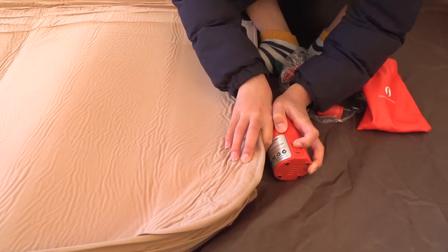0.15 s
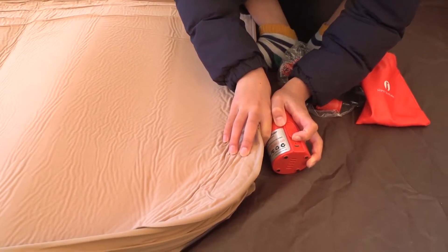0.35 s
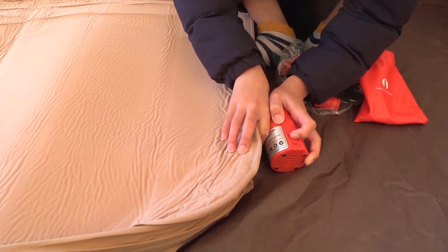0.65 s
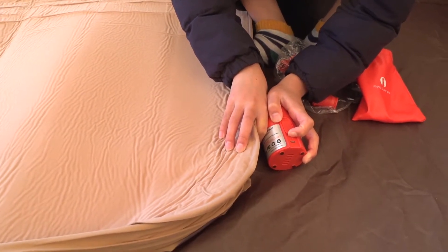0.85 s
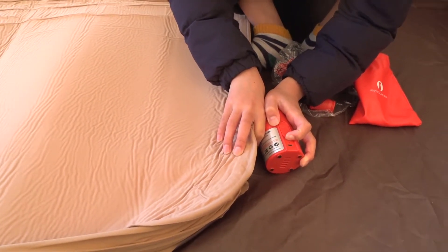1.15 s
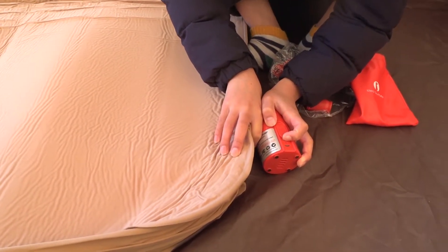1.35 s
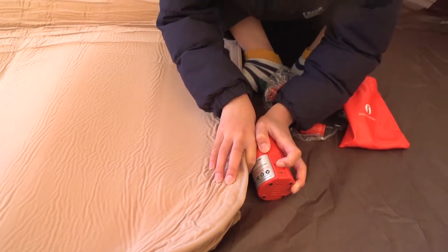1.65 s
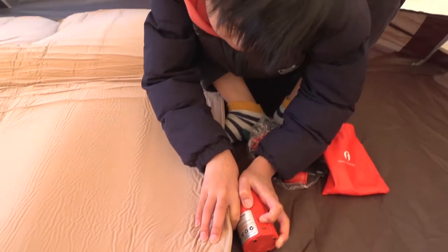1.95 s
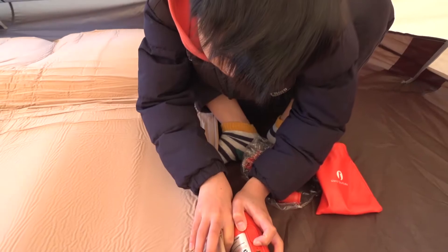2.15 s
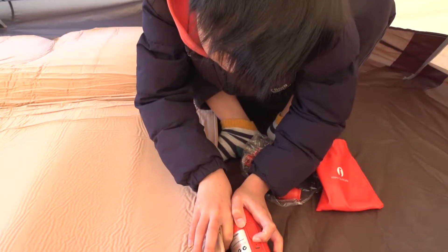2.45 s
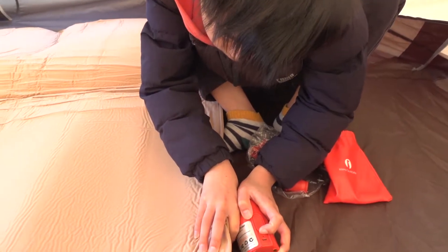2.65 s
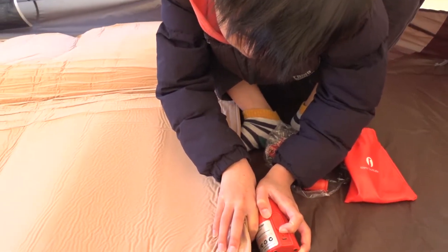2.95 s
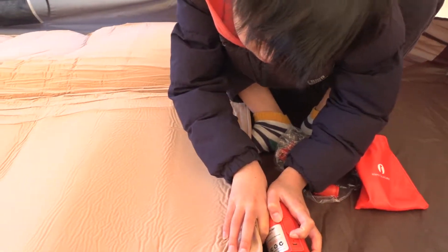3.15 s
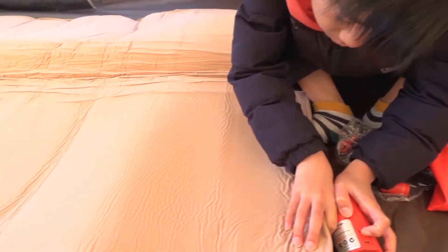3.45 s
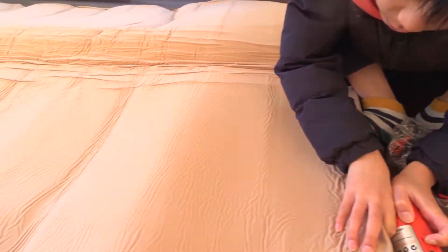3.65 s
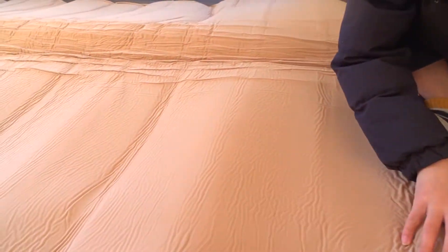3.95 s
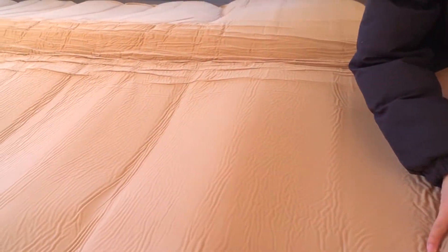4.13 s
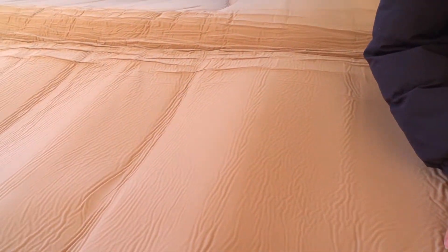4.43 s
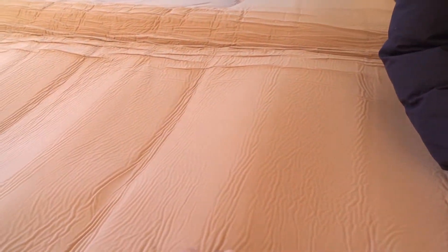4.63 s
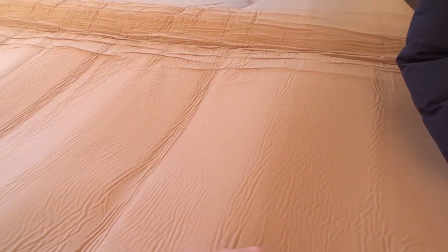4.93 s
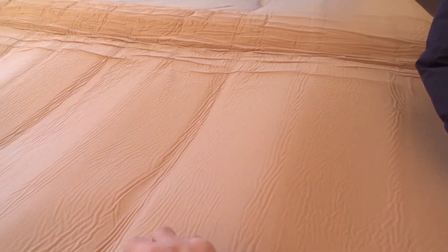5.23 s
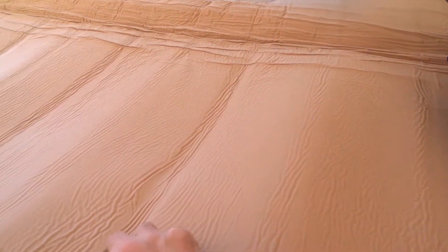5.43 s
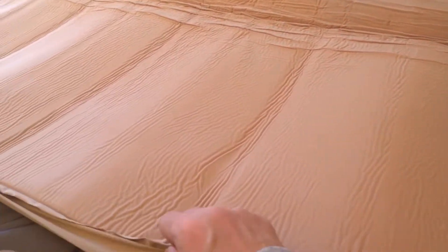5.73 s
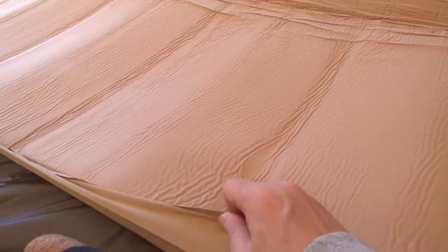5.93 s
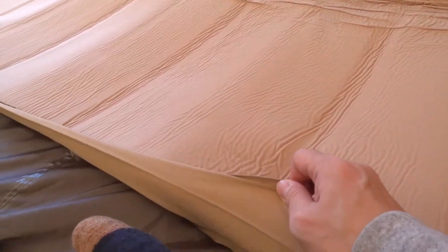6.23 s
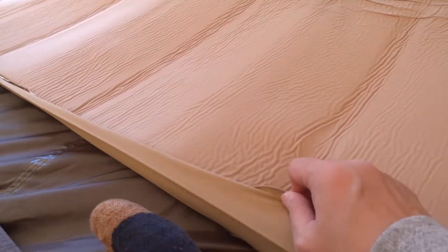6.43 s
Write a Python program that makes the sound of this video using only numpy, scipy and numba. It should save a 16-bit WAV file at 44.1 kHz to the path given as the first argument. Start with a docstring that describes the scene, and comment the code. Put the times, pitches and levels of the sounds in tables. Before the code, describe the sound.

A small electric air pump whirs steadily with a piercing whine and rushing hiss, while camera-handling thumps and low rumbles bump along, strongest on the left.

```python
"""In a tent, a small electric blower fills a camping mat close to a hand-held camera that tilts up and turns away.
The motor is sines on one shaft phase, with a strong eight-blade tone; the air is coloured noise
with drifting echoes, plus noise ringing two cavities. The shaking hand is low noise in opposite polarity,
its bumps are short dull swings, and the mat's cloth ticks in noise bursts. The right microphone is much weaker."""
import sys
import numpy as np
from scipy import signal
from scipy.fft import rfft, irfft
from scipy.io import wavfile
from scipy.ndimage import uniform_filter1d
from numba import njit

SR = 44100
rng = np.random.default_rng(int(sys.argv[2]) if len(sys.argv) > 2 else 0)


def master(y):
    """Save y as 16-bit WAV."""
    cut = np.clip(np.atleast_2d(y).T, -1, 1)
    pcm = np.round(cut * 32767)  # scale
    wavfile.write(sys.argv[1], SR, pcm.astype(np.int16))


def attenuation_scalar(level_db):
    """Turn a level in dB into a linear amplitude multiplier (20 dB per decade)."""
    decades = np.asarray(level_db, float) / 20
    return 10 ** decades


N = 290158
TIME = np.arange(N) / SR
SIDE = np.array([[0], [1]])  # 0 left, 1 right

# camera aim: (time [s], aim [0 down at the pump, 1 tilted up, 2 turned aside, 3 down at the mat])
CAMERA_AIM = [(0, 0), (1.75, 0), (2.05, 1), (3.5, 1), (3.9, 2.5), (5.45, 2), (5.65, 3), (6.58, 3)]
# cloth ticks: (time [s], onset level [dB], centre [Hz], width [Hz], t60 [s], left minus right [dB])
CLOTH_TICKS = [(2.04, -38, 9000, 9000, .08, 6), (3.57, -38, 7400, 900, .06, 12),
               (4.882, -29, 7990, 300, .05, 12), (6.247, -32, 10000, 9000, .06, 12)]
# shake spectrum, relative: (frequency [Hz], density [dB per Hz])
SHAKE_SPECTRUM = [(5.9, -20), (10, 3), (21, 7), (30, -4.5), (40, -9.5), (54, -26), (90, -42), (120, -59),
                  (200, -120)]
# hand tremor, swelling to its strongest near 4.3 s, then easing: (time [s], level before microphone gain [dB])
HAND_TREMOR = [(0, -47), (2.3, -43.5), (3.4, -33), (4.3, -32), (5.2, -40), (6.58, -41)]
# jolts of the hand: (time [s], peak level before microphone gain [dB], half length [s])
HAND_JOLTS = [(0.402, -43, 0.068), (1.08, -39, 0.067), (1.599, -41, 0.084), (2.44, -42, .05),
              (2.716, -29, 0.051), (2.916, -25.5, 0.074), (3.12, -48, .05), (4.583, -28, 0.029),
              (4.76, -31.5, 0.062), (5.16, -22.5, 0.055), (5.372, -32, 0.065), (5.562, -26, 0.068),
              (5.7, -24.5, .06), (5.902, -32, .03), (6.05, -33, .04), (6.337, -29.5, 0.1)]
# fingers bump the camera: (time [s], level before common gain [dB], frequency [Hz], left minus right [dB])
FINGER_BUMPS = [(1.504, -48, 218, -2.0), (2.268, -27.5, 213, 23), (3.012, -41, 145, 7),
                (3.954, -38, 186, 21), (4.405, -41, 129, 18.5), (4.866, -40, 86.1, 21.0),
                (4.962, -36.5, 137, 9.5), (5.325, -40, 116, 18.0), (5.776, -40, 80.7, 24.5),
                (6.234, -42, 135, 25.5), (6.529, -42, 80.7, 12.5)]
# tent wall and mat reflections: (lag [s], drift [s], gain [ratio])
TENT_ECHOES = [(.0014, 0.00025, 0.21), (.0031, 0.000607, 0.24)]
# air rush before trims: (frequency [Hz], density at aims 0, 1, 2, 3 [dB per Hz], right weaker by [dB])
AIR_SPECTRA = [(70.0, -72.5, -71, -73, -66, 13.0), (110, -82, -73, -83, -73, 13),
               (160, -77, -78, -76, -71, 11), (237, -68, -67.5, -70, -67.5, 14),
               (400, -66.5, -67, -65, -64, 16), (497, -60.5, -62, -59.5, -61.5, 17),
               (625, -58.5, -59, -60, -59, 24), (1170, -52.5, -49.5, -53.5, -58, 23),
               (1690, -59, -58.5, -62.5, -60, 11.5), (2140, -58.5, -60, -53.5, -55.5, 18.3),
               (2476, -53, -54, -50.5, -54.5, 20.5), (2970, -63, -58.0, -59.5, -60.5, 15),
               (3650, -53, -57, -54.5, -60.5, 17), (3920, -57.5, -59, -63, -60, 18.4),
               (5000, -54.5, -55, -58, -59, 18), (5550, -59, -59, -56.5, -61.5, 19),
               (5780, -63, -62, -61.5, -65.5, 9.5), (7400.0, -68, -68.5, -71, -71.5, 14),
               (9000.0, -72, -75.5, -73, -78.5, 29), (11500, -74.5, -79.5, -78.5, -83, 50),
               (14000.0, -79, -80, -85, -89, 58), (15500.0, -81, -81, -89, -86, 32)]
# likeness of the rush at the two microphones: (frequency [Hz], common share [ratio])
MIC_LIKENESS = [(60, .2), (250, 0.52), (600, 0.8), (1500, 0.92), (2500, 0.69), (5000, 0.37), (12000, 0.29)]
# low and high cavity, each a close pair of resonances: (width [Hz], half gap at split 1 [Hz])
CAVITY_PAIRS = [(120., 37), (160., 100)]
# cavities of housing and nozzle, a row per aim, levels before trim: (low [Hz], high [Hz], split [ratio],
# low left [dB], high left [dB], low right [dB], high right [dB])
CAVITIES_AT_AIM = [(923, 1418, 0.7, -26.5, -21, -51, -40), (966, 1423, 1.2, -30.5, -22.5, -47.5, -39),
                   (912, 1360, 0.84, -33, -24, -54, -49), (838, 1330, 0.92, -26, -27, -40.5, -42.5)]
# how squarely the outlet's thin treble reaches the camera: (time [s], extra whine near 10 kHz [dB])
TREBLE_GLINT = [(0, -3), (1, -3), (2.6, 1), (3.4, -1), (4, 5.5), (4.45, 0.5), (4.7, -1), (5.5, 1), (5.8, 5),
                (6.1, -3), (6.58, 1)]
# shaft hunting under the impeller's load: (time [s], turns [Hz])
SHAFT_SPEED = [(0, 315.6), (.3, 315.55), (.44, 315), (.62, 315.55), (.78, 315.6), (.88, 315.2), (1, 315.6),
               (1.52, 315.6), (1.85, 314.6), (2, 315.2), (2.15, 315.1), (2.42, 316.5), (2.55, 315.85),
               (3, 315.65), (3.2, 314.8), (3.5, 315.1), (3.74, 316), (4, 315), (4.5, 315.15),
               (4.63, 314.75), (5.08, 315.35), (5.28, 315.1), (5.45, 313.6), (5.7, 315.35), (5.95, 314.7),
               (6.05, 315.05), (6.38, 314.2), (6.58, 314.3)]
# strong tones as the camera moves through their beams:
# (time [s], left blade tone [dB], left 14th order [dB], left 16th order [dB])
TONE_BEAMS = [(0, -47, -25, -32), (.55, -29, -23.5, -51), (.8, -44, -26, -32), (1, -43, -23.5, -29),
              (1.35, -46, -22, -32), (1.75, -44, -23, -49), (1.88, -28, -26, -31), (2.08, -25, -30, -25.5),
              (2.33, -23.5, -28.5, -27.5), (2.75, -24.5, -29, -22), (3.05, -21, -30, -27),
              (3.3, -23.5, -30, -38), (3.52, -30, -39, -25.5), (3.72, -38, -28, -32.5),
              (4.07, -22, -37, -34.5), (4.6, -20.5, -45, -36.5), (4.8, -22.5, -30, -37),
              (5.02, -21.5, -36, -39), (5.22, -20, -32, -30), (5.4, -21, -37, -36), (5.75, -15, -31, -31),
              (5.95, -17.5, -53, -31.5), (6.3, -22.5, -44, -33.5), (6.58, -16.5, -47, -33)]
# right blade tone, a value per aim: (level [dB])
BLADE_RIGHT = [-41.5, -43.5, -46, -38]
# weaker shaft orders: (order [per turn], left level at aims 0, 1, 2, 3 [dB], right weaker by [dB])
WEAK_ORDERS = [(1, -45.5, -46, -45, -45, 21), (3, -36, -38, -43, -41, 17), (6, -39, -39, -45, -47, 16),
               (7, -48, -47, -51, -70, 17), (9, -41, -40, -43, -46, 13), (10, -39, -37, -37, -40, 15),
               (11, -37, -32, -34, -38, 17), (12, -33, -33, -38, -38, 19), (13, -42, -40, -50, -44, 15),
               (15, -31, -33, -40, -39, 18), (17, -44, -39, -41, -43, 14), (18, -44, -40, -39, -42, 11),
               (19, -45, -39, -46, -48, 12), (20, -47, -46, -63, -52, 13), (21, -43, -42, -50, -52, 15),
               (22, -44, -46, -53, -52, 14), (23, -54, -53, -52, -56, 12), (24, -47, -50, -58, -57, 10),
               (25, -58, -55, -51, -56, 11), (26, -48, -45, -47, -59, 15), (27, -51, -54, -52, -60, 13),
               (28, -53, -49, -51, -51, 13), (29, -53, -51, -45, -56, 15), (30, -53, -46, -44, -52, 16),
               (31, -49, -45, -46, -57, 18), (32, -49, -39, -51, -59, 16), (33, -50, -42, -58, -55, 11),
               (34, -61, -51, -56, -63, 12), (35, -46, -45, -48, -53, 12), (36, -52, -51, -54, -58, 8),
               (37, -54, -57, -60, -60, 13), (38, -52, -53, -63, -69, 15), (39, -50, -48, -54, -62, 16),
               (43, -51, -53, -63, -67, 16), (45, -56, -59, -64, -70, 11), (48, -53, -59, -70, -70, 12)]


def columns(table):
    """Every column after time, interpolated to samples."""
    time_s, *rest = np.transpose(table)
    return [np.interp(TIME, time_s, column) for column in rest]


def by_aim(aim, values):
    """Blends one value for each of the four aims."""
    return np.interp(aim, range(4), values)


def walk(rate_hz, count=1):
    """Slow chance: smoothed random knots joined by lines, spread near 1."""
    knots = rng.standard_normal((count, int(3 * rate_hz * N / SR) + 2))
    knots = uniform_filter1d(knots, size=3, axis=1)
    place = TIME * 3 * rate_hz
    return np.array([np.interp(place, np.arange(len(k)), k) for k in knots]) * np.sqrt(3)


def over_log_hz(hz, values):
    """Interpolates a curve over log frequency at every FFT bin."""
    log_hz = np.log(np.arange(N // 2 + 1) * SR / N + 1)
    return np.interp(log_hz, np.log(hz), values)


def colour(x, hz, db):
    """Gives unit white noise a spectrum in dB per Hz."""
    return irfft(rfft(x) * attenuation_scalar(over_log_hz(hz, db)) * np.sqrt(SR / 2), N)


def pair(likeness, lag_s):
    """Noise at both microphones; the right shares a delayed part of the left, by (frequency [Hz], share)."""
    left, own = rng.standard_normal((2, N))
    share = np.clip(over_log_hz(*np.transpose(likeness)), 0, 1)
    common = share * rfft(np.roll(left, round(lag_s * SR)))
    separate = np.sqrt(1 - share ** 2) * rfft(own)  # keeps unit power
    return np.array([left, irfft(common + separate, N)])


@njit
def svf(x, hz, width):
    """State-variable band-pass with moving centre, unit gain there."""
    y, band, low = np.empty(len(x)), 0., 0.
    for i in range(len(x)):
        g, k = np.tan(np.pi * hz[i] / SR), width / hz[i]
        v = (band + g * (x[i] - low)) / (1 + g * (g + k))
        band, low, y[i] = 2 * v - band, low + 2 * g * v, k * v
    return y


def cloth():
    """Cloth ticks: band-passed noise bursts with exponential decay."""
    out = 0
    for start_s, db, hz, width_hz, t60_s, pan_db in CLOTH_TICKS:
        burst = svf(rng.standard_normal(N), np.full(N, 1. * hz), 1. * width_hz)
        fade = (TIME > start_s) * attenuation_scalar(-60 * np.clip(TIME - start_s, 0, 1) / t60_s)
        out = out + attenuation_scalar(db - pan_db * SIDE) * fade * burst / burst.std()
    return out


def shake():
    """Shaking moves the two membranes in opposition: low noise swelling with tremor and jolts."""
    noise = colour(rng.standard_normal(N), *np.transpose(SHAKE_SPECTRUM))
    size = attenuation_scalar(columns(HAND_TREMOR)[0])
    for centre_s, db, half_s in HAND_JOLTS:
        size = size + attenuation_scalar(db) * np.exp(-((TIME - centre_s) / half_s) ** 2)
    mic_gain_db = np.array([[6.5], [-3.5]])
    polarity = 1 - 2 * SIDE
    return noise / noise.std() * size * attenuation_scalar(mic_gain_db) * polarity


def bumps():
    """Each finger bump is one short dull swing: a cosine under a Gaussian, same polarity on both sides."""
    out = 0
    gain_db, delay_s, half_cycles = 8.0, .012, 0.59
    for bump_s, db, hz, pan_db in FINGER_BUMPS:
        t = TIME - bump_s - delay_s
        swing = np.exp(-(t * hz / half_cycles) ** 2) * np.cos(2 * np.pi * hz * t)
        out = out + attenuation_scalar(db + gain_db - pan_db * SIDE) * swing
    return out


def tent(x):
    """Near reflections on drifting paths give the hiss moving patches; power is roughly kept."""
    out = x
    for lag_s, drift_s, gain in TENT_ECHOES:
        drift = walk(1.2) + .4 * walk(1.2, count=2)  # common part, then one per microphone
        late = TIME - lag_s - drift_s * drift
        out = out + gain * np.array([np.interp(t, TIME, channel) for t, channel in zip(late, x)])
    return out / np.sqrt(1 + 0.6 * sum(gain ** 2 for *_, gain in TENT_ECHOES))


def air_rush(aim, turn):
    """Broad turbulence whose spectrum follows the aim, with wandering bass and treble that pulses each turn."""
    hz, *spectra, weaker_db = np.transpose(AIR_SPECTRA)
    bass_db = 4.8 * walk(3.8) - 3.5
    left, right = pair(MIC_LIKENESS, lag_s=.0001)
    rush = 0
    for k, db in enumerate(spectra):
        share = np.clip(1 - abs(aim - k), 0, 1)
        rush = rush + share * np.array([colour(left, hz, db), colour(right, hz, db - weaker_db)])
    treble = signal.sosfilt(signal.butter(2, 5500, "high", fs=SR, output="sos"), rush)
    glint_share = 0.15  # part of the whine's swing that the hiss follows
    treble_db = glint_share * columns(TREBLE_GLINT)[0] + 0.43 + 1.2 * walk(6)
    rush = rush + treble * (attenuation_scalar(treble_db) * (1 + 0.13 * np.cos(turn)) - 1)
    bass = signal.sosfilt(signal.butter(2, 220, fs=SR, output="sos"), rush)
    return tent(rush + bass * (attenuation_scalar(bass_db) - 1))


def cavities(aim):
    """Turbulence rings two cavities, each two band-passes in series; their tuning follows the aim slowly."""
    window_s = 0.83
    slow_aim = uniform_filter1d(aim, int(window_s * SR))
    low_hz, high_hz, split, *db = (by_aim(slow_aim, c) for c in np.transpose(CAVITIES_AT_AIM))
    out = 0
    for k, (centre_hz, (width_hz, half_gap_hz)) in enumerate(zip((low_hz, high_hz), CAVITY_PAIRS)):
        ring = []
        # the right microphone hears the pair closer together
        for noise, apart in zip(pair([(1000, 0.94)], lag_s=0.00155), (1, .3)):
            offset_hz = half_gap_hz * split * apart
            lower = svf(noise, centre_hz - offset_hz, width_hz)
            ring.append(svf(lower, centre_hz + offset_hz, width_hz))
        ring = np.array(ring)
        out = out + ring / ring.std() * attenuation_scalar(np.array(db[k::2]) + 1.33 * walk(10.5))
    return out


def air(aim, turn):
    """Rush and cavity ringing, trimmed together."""
    trim_db = 0.56
    return (air_rush(aim, turn) + cavities(aim)) * attenuation_scalar(trim_db)


def shaft():
    """Shaft phase [rad]: integral of the hunting speed with slight jitter."""
    hz = columns(SHAFT_SPEED)[0]
    jitter = 0.00037 * walk(30)[0]
    return 2 * np.pi * np.cumsum(hz * (1 + jitter)) / SR


def motor(aim, turn, waver_db=0.5155, eddy_share=0.12):
    """Sines on the shaft phase; reflections make weak orders waver, high ones most, apart at each microphone."""
    blade_db, db14, db16 = columns(TONE_BEAMS)
    blade_right_db = by_aim(aim, BLADE_RIGHT) + 4 * walk(3)[0]
    lines = [(8, np.array([blade_db, blade_right_db]) + 0.6 * walk(9)),
             (14, db14 - 24 * SIDE + 3 * SIDE * walk(2.0)),
             (16, db16 - 21 * SIDE + 3 * SIDE * walk(1.5))]
    glint_db = columns(TREBLE_GLINT)[0]
    for order, *dbs, weaker_db in WEAK_ORDERS:
        whine_db = glint_db * np.exp(-((order - 31) / 5) ** 2)
        waver = waver_db * np.sqrt(order) * walk(2.503, count=2)
        lines.append((order, whine_db + by_aim(aim, dbs) - weaker_db * SIDE + waver))
    starts = rng.uniform(0, 2 * np.pi, (len(lines), 2, 1))
    out = 0
    for (order, rms_db), start in zip(lines, starts):
        eddies = 1 + eddy_share * walk(70)  # eddies passing the blades roughen every tone
        out = out + np.sqrt(2) * attenuation_scalar(rms_db) * eddies * np.sin(round(order) * turn + start)
    return out


def scene():
    """Cloth, hand, air and motor at the two microphones."""
    aim = columns(CAMERA_AIM)[0]
    turn = shaft()
    return cloth() + shake() + bumps() + air(aim, turn) + motor(aim, turn)


def top_cut(x):
    """Nothing passes above the cut-off."""
    return signal.sosfilt(signal.butter(12, 15750, fs=SR, output="sos"), x)


def record(dry):
    """The camera cuts the top with a steep elliptic low-pass."""
    top_hz = 15700
    cut = signal.sosfilt(signal.ellip(10, .2, 70, top_hz, fs=SR, output="sos"), dry)
    return top_cut(cut)


dry = scene()
out = record(dry)
master(out)
```